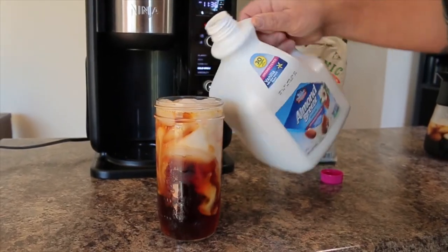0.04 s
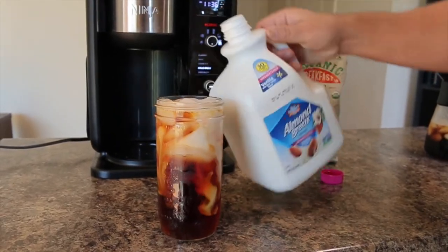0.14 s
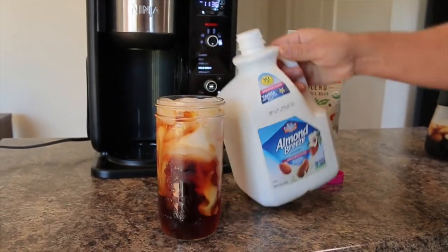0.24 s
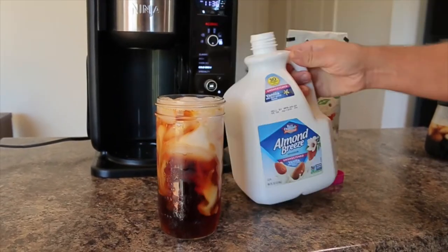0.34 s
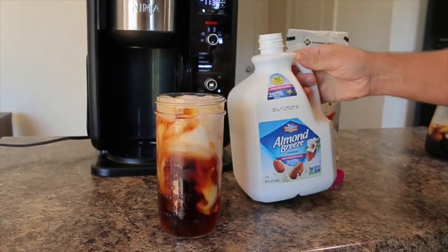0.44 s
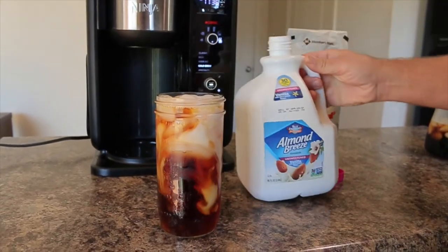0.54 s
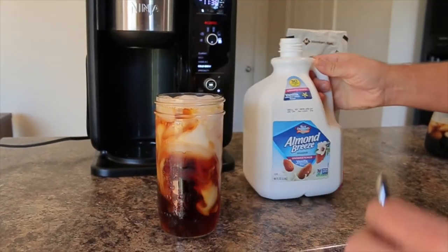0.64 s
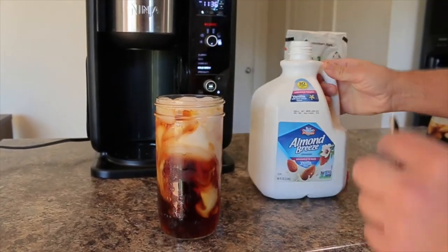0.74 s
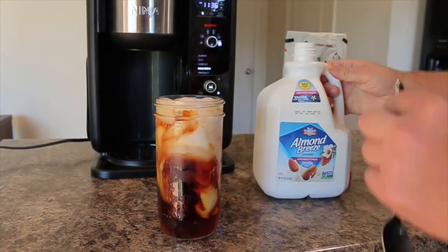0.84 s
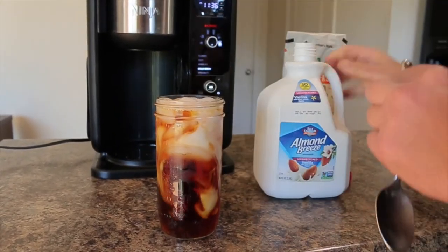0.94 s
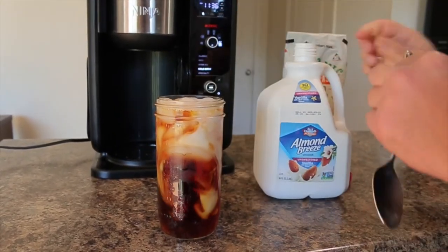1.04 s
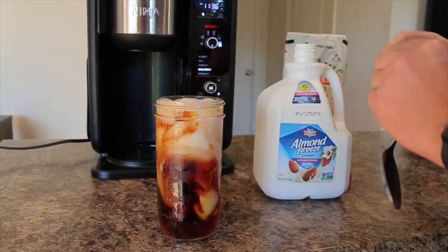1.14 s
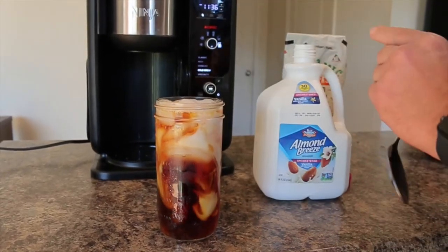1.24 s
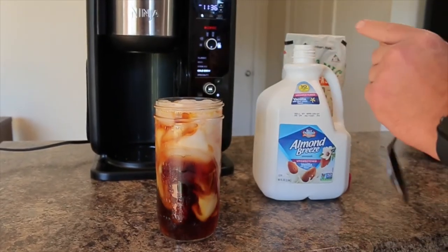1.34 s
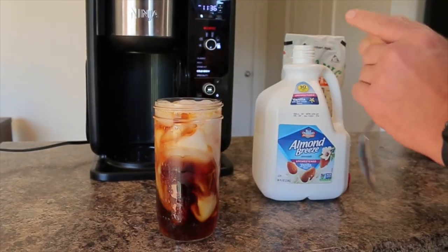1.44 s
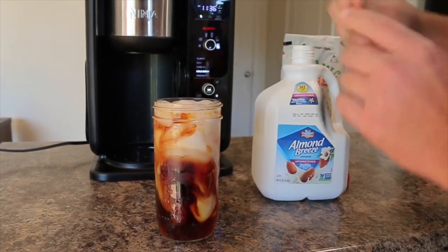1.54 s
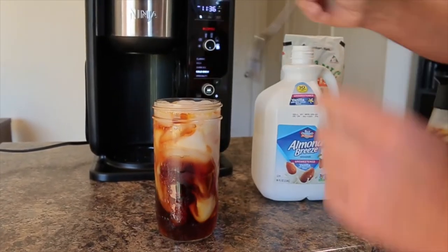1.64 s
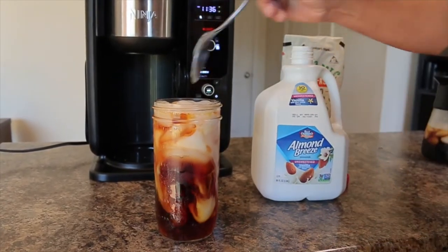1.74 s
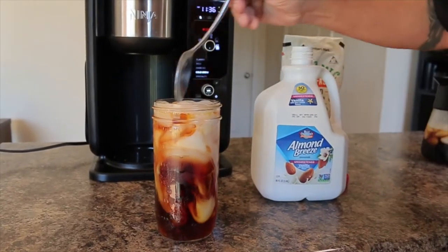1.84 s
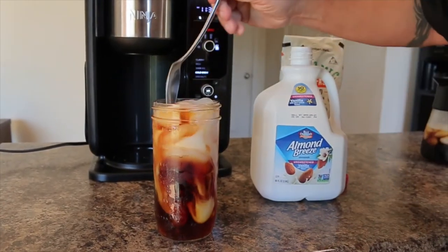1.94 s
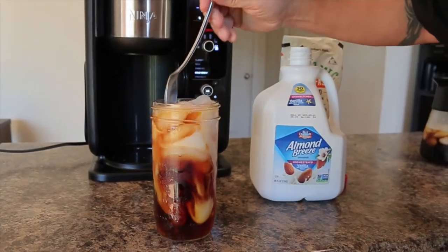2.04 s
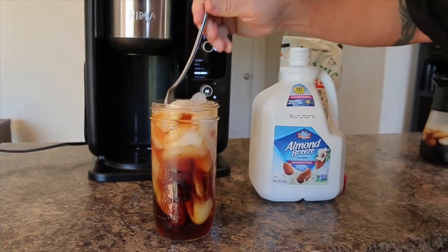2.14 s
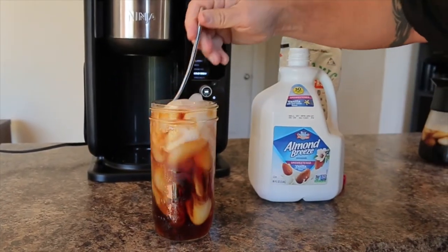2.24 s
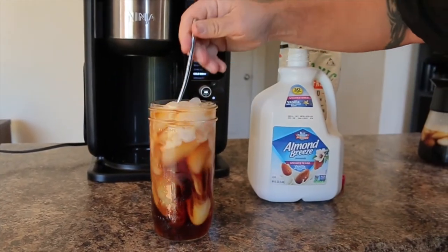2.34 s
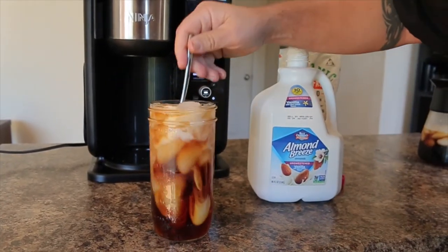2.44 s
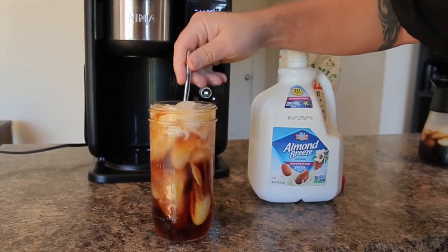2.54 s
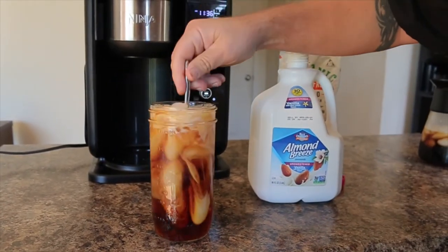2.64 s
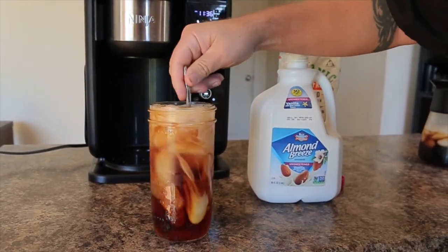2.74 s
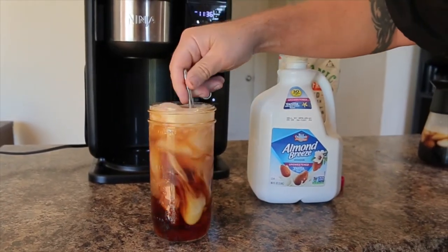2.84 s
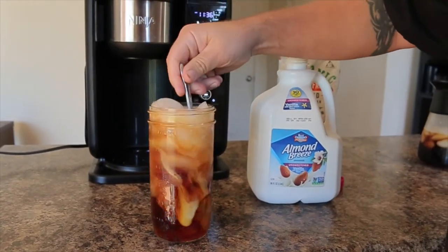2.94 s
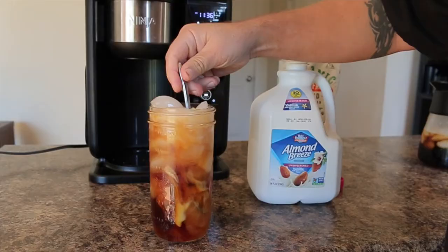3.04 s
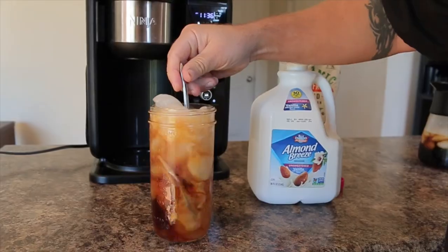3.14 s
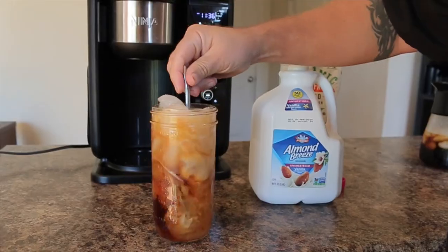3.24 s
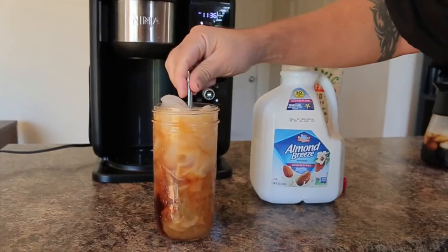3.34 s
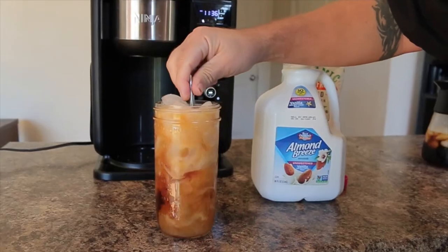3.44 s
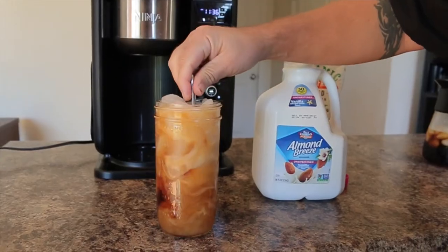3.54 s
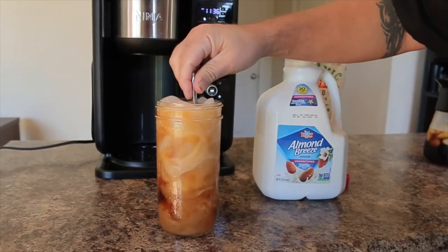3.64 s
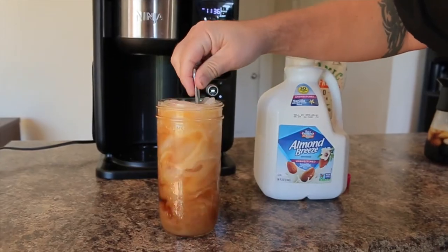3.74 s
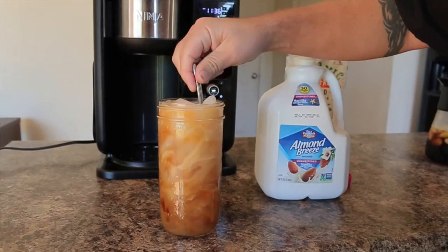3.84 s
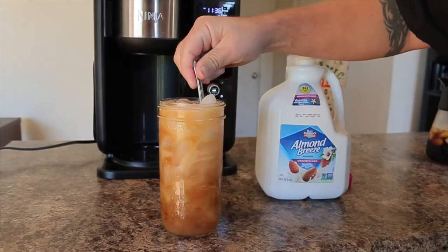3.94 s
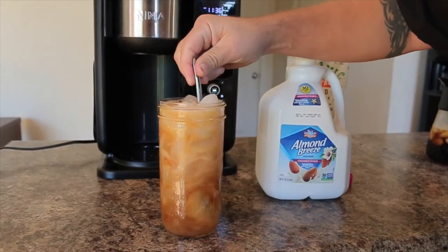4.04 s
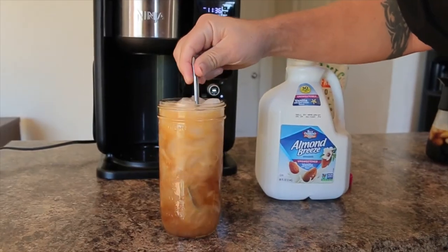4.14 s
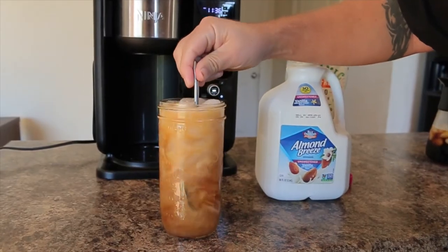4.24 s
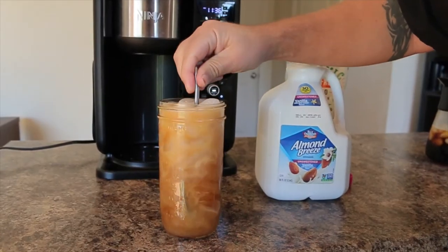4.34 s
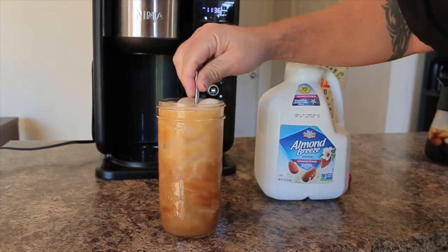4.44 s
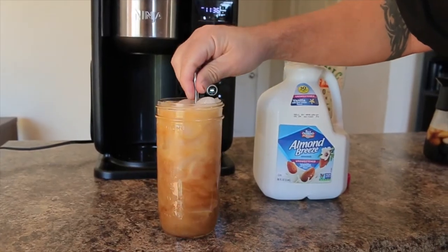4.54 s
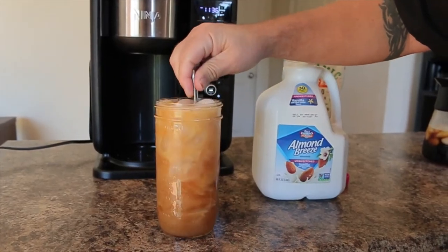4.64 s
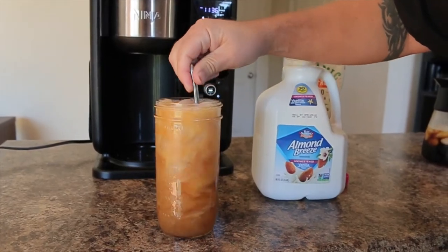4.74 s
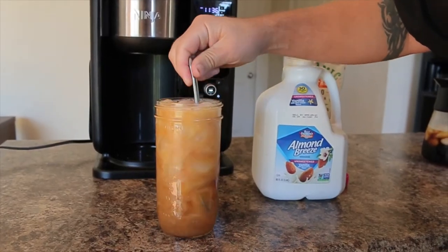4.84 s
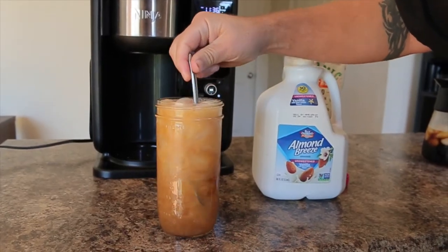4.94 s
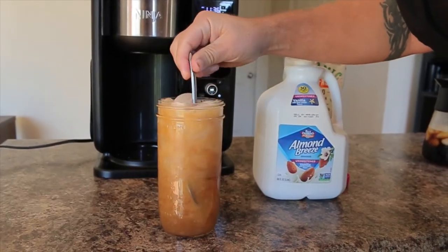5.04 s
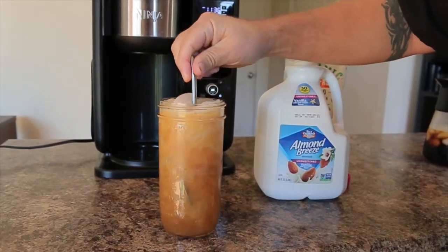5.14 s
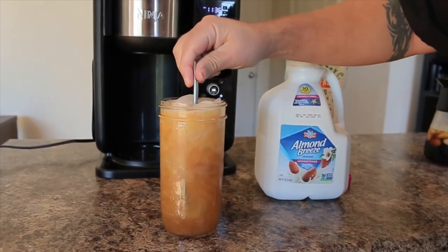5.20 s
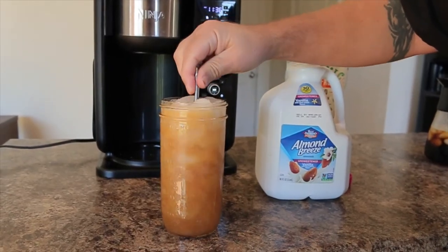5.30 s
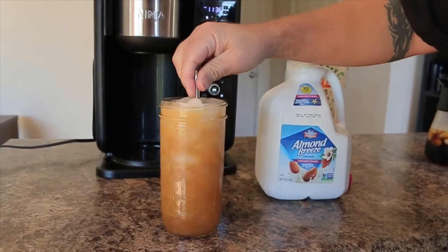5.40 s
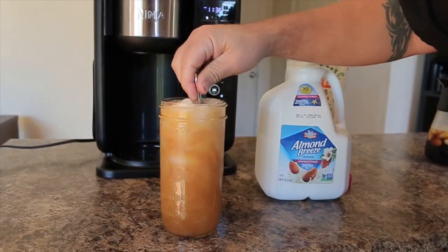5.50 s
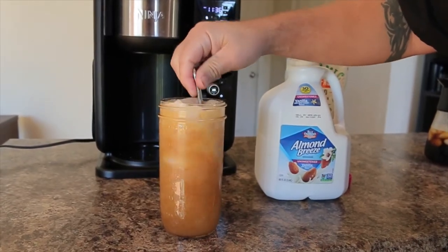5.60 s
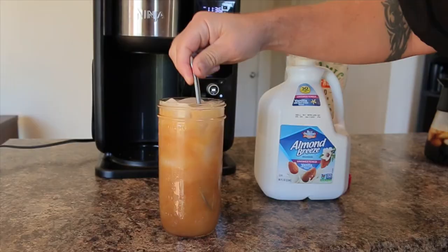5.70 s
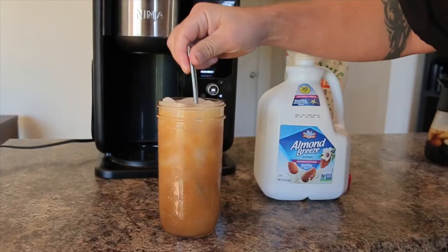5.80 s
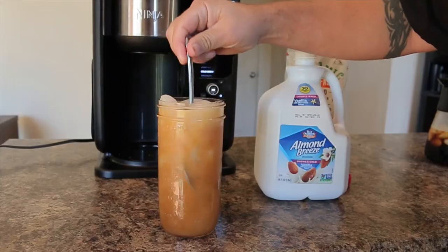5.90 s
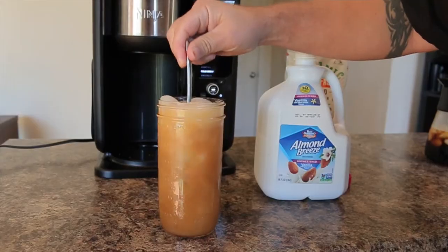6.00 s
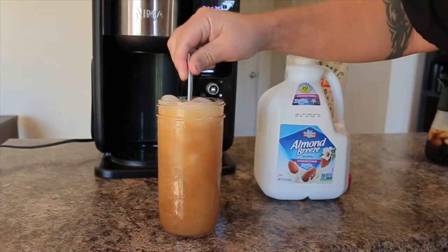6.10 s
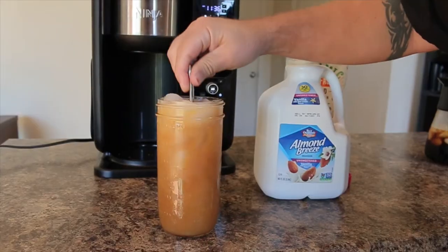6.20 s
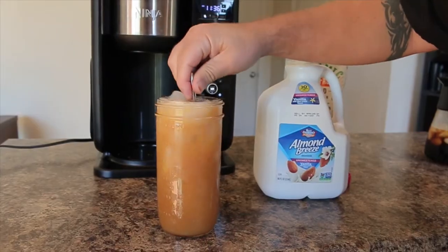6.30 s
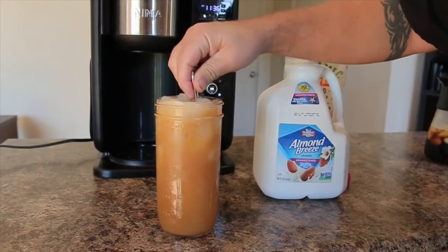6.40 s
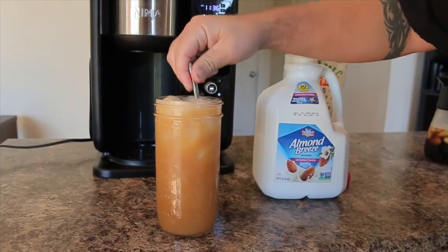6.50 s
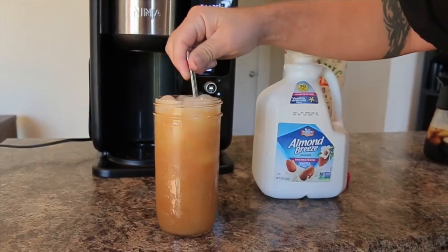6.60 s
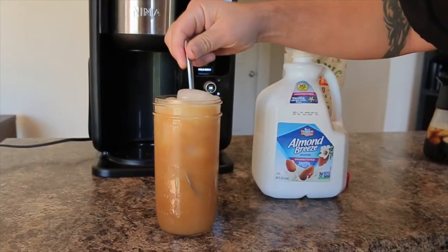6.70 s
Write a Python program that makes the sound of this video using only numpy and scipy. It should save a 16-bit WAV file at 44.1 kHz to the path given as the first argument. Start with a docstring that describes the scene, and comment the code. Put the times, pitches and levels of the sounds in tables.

```python
"""In a small, live kitchen a plastic milk jug is set down on the counter and nudged into place.
Then a long steel spoon stirs a glass jar of iced coffee: clinks and thuds are damped modes and filtered bursts,
rubbing, rolling, swish and jostling ice are coloured trains of tiny impacts, and bubbles are rising blips.
The room answers with decaying noise, over air noise and the wavering tones of an appliance motor."""
import sys
import numpy as np
from scipy import signal
from scipy.fft import rfft, irfft, next_fast_len
from scipy.io import wavfile
from scipy.ndimage import map_coordinates

SR = 44100
rng = np.random.default_rng(int(sys.argv[2]) if len(sys.argv) > 2 else 0)


def put_to_file(sound):
    """Save the sound as 16-bit audio at rate SR, in the file named by the first command-line argument."""
    columns = np.atleast_2d(sound).T  # one column per channel
    safe = np.clip(columns, -1, 1)
    whole_steps = np.round(safe * 32767)
    wavfile.write(sys.argv[1], SR, whole_steps.astype(np.int16))


N = 298116  # length [samples]

# Event and envelope levels are relative: each source may trim them.
# Spoon and ice on the glass: (time [s], ring [dB], clack [dB], hardness [0-1],
# twin-mode balance [about -1 to 1], ping [Hz])
CONTACTS = [(1.8926, -44, -42.5, 0.47, 0.74, 3296), (1.954, -48.5, -52.5, 0.65, .2, 4130),
            (2.138, -48, -44, 0.4, -0.19, 3760), (2.173, -56, -57, 0.83, -0.26, 3730),
            (2.211, -62, -57, .2, 0.4, 3580), (2.304, -48, -52, 0.43, 0.58, 3390),
            (2.386, -57.5, -56.5, .8, -0.12, 3700), (2.417, -57, -49, 0.1, 0.1, 3460),
            (2.549, -60, -57.5, 0, 0, 3780), (2.72, -53, -58, .2, 0.32, 3800),
            (2.7865, -33, -40, 0.48, 1, 3800), (2.8334, -38, -62, 0, .8, 5120),
            (2.8636, -44.5, -50, 0, .2, 5100), (2.936, -51.5, -58, 0.55, -0.22, 3260),
            (3.043, -57, -59, 0.91, .3, 5500), (3.059, -51, -55, 0, -0.023, 5600),
            (3.2167, -42, -53.5, 0.43, -0.73, 3940), (3.264, -55.5, -56, 0, -.1, 4370),
            (3.415, -59, -78, 0, 0.097, 3810), (3.733, -56.5, -62, .1, -0.11, 3910),
            (3.6, -65, -56.5, 0.3, -.1, 5520), (3.645, -44, -55, 0.26, -0.4, 3340),
            (4.083, -54.5, -71, 0, -.2, 3690), (4.1451, -36.5, -47.5, 0.43, -0.94, 5070),
            (4.242, -60, -54.5, .1, 0, 3800), (4.552, -60, -59, 0.5, -0.12, 3230),
            (4.8727, -41, -42.5, 1, 0.24, 3150), (4.995, -58, -61, 0.4, -0.35, 5500),
            (5.5496, -55.5, -53, 0.48, 0.16, 3890), (5.138, -55, -60, 0.1, 0.071, 3930),
            (5.763, -52, -57, 0, -0.31, 4290), (5.8978, -32, -46, 0.46, -.8, 5000),
            (6.169, -50, -54, 0.4, 0, 3300), (6.1758, -43.5, -52.5, 0.24, 0.41, 3340),
            (6.322, -55, -58, .3, -0.29, 3860), (6.3614, -32, -44, 0.62, 1, 3290),
            (6.431, -50, -55, 0, 0.45, 3240), (6.7093, -47, -51, 0, -0.43, 5660),
            (6.7404, -43, -51.5, 0.67, 0.41, 5380)]
# The jar's lingering modes: (frequency [Hz], level [dB], t60 [s])
GLASS_MODES = [(1021, -11.5, 0.26), (1222, -11.5, 0.23), (1650, -23.5, 0.31), (2130, -29, 0.081),
               (2270, -18, 0.036), (2554, -17.5, 0.14), (2860, -36, 0.45), (3240, -15, 0.094),
               (3976, -19, 0.11), (5120, -17, 0.19), (5500, -15, 0.15), (6300, -22, 0.076),
               (7080, -23, 0.15), (7900, -15, 0.2)]
# The wall's main mode, split in two and damped by the drink: (lower [Hz], upper [Hz])
TWIN_HZ = (2674, 2810)
# Where clack, ring, crack and sparkle are strongest: (clack [Hz], ring [Hz], crack [Hz], sparkle [Hz])
ZONES_HZ = (1170, 2560, 3930, 6940)
# Spectra of a contact's noisy parts, low to high: (frequency [Hz], level [dB])
CLACK_SPECTRUM = [(350, -36.5), (720, 1), (950, -7), (1190, 6), (1500, -2), (2200, -5), (2700, 3),
                  (4000, -41.5), (9000, -47)]
CRACK_SPECTRUM = [(2200, -32), (3200, -8), (3850, -3.5), (4500, -8.5), (5250, -13), (6000, -22),
                  (9000, -26.5), (14000, -41)]
SPARKLE_SPECTRUM = [(4000, -40), (6400, 5), (7200, -1), (8500, -10), (10000, -10.5), (12500, -21),
                    (16000, -25)]
# Levels at the softest and the hardest contact [dB]: crack and sparkle over ring, ping over clack
CRACK_OVER_RING_DB, SPARKLE_OVER_RING_DB, PING_OVER_CLACK_DB = [-14, -1], [-36.5, -3.5], [-11, -0.5]

# Envelopes of the stirring: (time [s], swish [dB], jostling ice [dB])
STIR = [(1.92, -73, -69), (2.09, -60, -65.5), (2.26, -57, -60), (2.73, -68.5, -74), (2.94, -57.5, -59),
        (3.39, -67, -66.5), (4.21, -61.5, -67), (4.48, -68.5, -71), (5.02, -61, -61), (5.36, -67, -71.5),
        (5.8, -58, -62), (5.95, -69, -58.5), (6.25, -64, -69), (6.62, -55, -62), (6.76, -48, -68)]
# Spectra of the swishing drink and of cubes on the wall: (frequency [Hz], level [dB])
SWISH_SPECTRUM = [(250, -10), (400, -5.5), (700, -2.5), (950, -9.5), (1200, 4.5), (1450, -3.5), (2000, -15),
                  (3500, -19.5), (7000, -28), (15000, -46)]
ICE_SPECTRUM = [(1200, -22), (2300, -27), (2680, 8), (2850, 7.5), (3100, -25), (3900, -9), (5200, -18),
                (8000, -33), (15000, -45)]
# The drink closes behind a deep stroke: (time [s], level [dB])
GULPS = [(6.53, -34.5), (6.588, -46)]
GULP_ATTACK_S, GULP_T60_S = 0.0051, 0.16
# Spectra of the closing drink and of the foam: (frequency [Hz], level [dB])
GULP_SPECTRUM = [(150, -33), (280, -12), (370, -3.5), (450, 9), (560, -15), (720, 8.5), (880, 4), (1020, 1),
                 (1250, -9), (1500, -8), (2100, -13.5), (3200, -22), (6000, -46)]
FIZZ_SPECTRUM = [(1000, -4), (2500, 3), (5000, -3), (8000, -6.5), (15000, -21)]
# The churning, fizzing wake of that stroke
WAKE_START_S, WAKE_LENGTH_S, WAKE_DB, FIZZ_DB = 6.56, 0.31, -53, -56.5

# The spoon pushes through the cubes: (start [s], length [s], rubbing [dB], rolling [dB])
STROKES = [(1.883, 0.18, -52.5, -53), (2.127, .05, -50, -56), (2.275, 0.081, -52.5, -48.5),
           (2.364, 0.23, -60.5, -50.5), (2.817, 0.26, -59, -72), (3.02, 0.13, -62, -52),
           (3.11, 0.25, -80, -56), (3.565, 0.14, -62, -63), (3.928, 0.078, -54.5, -61),
           (4.54, 0.1, -57.5, -60), (4.877, 0.4, -64, -64), (5.53, .13, -62, -61), (5.734, 0.12, -56, -57),
           (6.308, 0.1, -56, -49)]
STROKE_RISE = 0.28  # share of a stroke spent building up
# Spectra of steel on ice and of rolling cubes: (frequency [Hz], level [dB])
RASP_SPECTRUM = [(500, -1), (1180, 12.5), (1600, 0), (2200, 5), (2800, 3.5), (3300, 3.5), (3900, 0),
                 (5200, -19), (8000, -14), (14000, -35)]
RUMBLE_SPECTRUM = [(45, -44.5), (80, -5), (100, -0.5), (125, -8.5), (165, -2.5), (210, -6.5), (280, -13.5),
                   (450, -15), (900, -48.5)]
ROLL_DB = -69.5  # cubes trundling between strokes

# The spoon shoves cubes against the jar's base: (time [s], boom [dB], knock [dB])
THUDS = [(1.892, -49, -43.5), (1.953, -52.5, -48), (1.984, -46, -48.5), (2.139, -49.5, -44.5),
         (2.788, -56, -49.5), (3.6, -51, -48), (3.644, -46.5, -44.5), (3.658, -51.5, -50.5),
         (4.59, -54, -53), (4.874, -58, -49), (5.553, -42.5, -54), (5.568, -46.5, -49.5), (5.779, -54, -49),
         (6.385, -49.5, -48), (6.599, -53, -51)]
# Modes of the counter and what stands on it: (frequency [Hz], width [Hz], level [dB])
BOOM_MODES = [(80.6, 13, -5.5), (103, 25, -1.5), (176, 26, -2), (208, 24, 0.5)]
# Higher modes of the same blows: (frequency [Hz], width [Hz], level [dB])
KNOCK_MODES = [(308, 21, -2), (378, 49, 0.5), (710, 71, -9.5), (910, 67, -17)]
# The jug lands and rocks: (time [s], level [dB])
LANDINGS = [(0.3349, -29.5), (0.362, -47), (.374, -46), (.535, -39.5), (.561, -48.5), (0.782, -49)]
# Modes of the jug on the counter: (frequency [Hz], width [Hz], level [dB])
PLASTIC_MODES = [(84.6, 25, -2), (97, 35, -0.5), (172, 35, 4), (215, 44, -2.5), (291.6, 19, -2.5),
                 (435, 85, -11), (521, 43, -9), (705, 68, -11.5), (840, 150, -14), (1420, 310, -21.5),
                 (1760, 110, -24.5)]
# The jug's base catches, then slides: (time [s], catch [dB], slide length [s], drag [dB])
SCUFFS = [(0.334, -44.5, 0.069, -47), (0.533, -40.5, .12, -49.5), (0.735, -39.5, 0.17, -51),
          (0.83, -41, 0.1, -54), (0.896, -47, 0.098, -47)]
SLIDE_RISE = 0.13  # share of a slide spent gaining speed
# Spectrum of the scraping base: (frequency [Hz], level [dB])
SCRAPE_SPECTRUM = [(150, -45), (250, 1), (332, -4.5), (404, 0.5), (462, -8.5), (562, -2.5), (1360, -14),
                   (2670, -15.5), (9000, -40), (11700, -71), (19800, -120)]
# The jug's wall shudders while pushed: limits, first level, fade, time to start and stop
JUDDER_START_S, JUDDER_STOP_S = 0.554, 1.05
JUDDER_DB, JUDDER_FADE_DB_PER_S, JUDDER_EDGE_S = -44.5, 31, 0.024

# Decay of the room: (frequency [Hz], t60 [s])
ROOM_T60 = [(100, 0.38), (400, 0.35), (1200, 0.49), (3000, 0.33), (6000, 0.52), (14000, 0.39)]
# Correlation of the room's tail: (frequency [Hz], left-right likeness [-1 to 1])
ROOM_ALIKE = [(200, .99), (1000, 0.9), (2800, 0.43), (5000, 0.064), (10000, .05)]
# The kitchen's steady noise: (frequency [Hz], level [dB])
AIR_SPECTRUM = [(15, -48), (25, -31), (64, -9.5), (91, -32), (107, -14), (221, -6.5), (260, -11.5),
                (359, -7), (703, -16.5), (762, -16), (919, -17.5), (1110, -18.5), (2300, -26), (2630, -27),
                (15500, -35)]
AIR_DB = -57.5
# Correlation of that noise: (frequency [Hz], left-right likeness [-1 to 1])
AIR_ALIKE = [(60, 0.63), (150, 0.95), (380, 0.89), (950, 0.81), (2380, 0.19), (5980, -0.015),
             (15000, -0.079)]
# Lines of an appliance motor: (frequency [Hz], level [dB])
HUM = [(226.1, -70.5), (301.5, -67.5), (355.3, -65), (516.8, -95), (710.6, -72.5)]
TOP_HZ = 15800  # upper band limit


def clinks(twin_t60=0.032, ping_t60=0.049, clack_db=-1, lean_db=1.6):
    """Impact excitation: harder contacts are brighter; beating twin modes start the ring hard or let it swell."""
    out = np.zeros((2, N))
    t = np.arange(SR // 3) / SR
    brief = t[:SR // 16]

    def tone(hz, t60):
        """Free decay of one mode."""
        return blow(np.sin(2 * np.pi * hz * t) * np.exp(-np.log(1000) * t / t60))

    for s, ring, clack, hardness, balance, ping_hz in CONTACTS:
        crack = ring + np.interp(hardness, [0, 1], CRACK_OVER_RING_DB)
        sparkle = ring + np.interp(hardness, [0, 1], SPARKLE_OVER_RING_DB)
        ping = clack + np.interp(hardness, [0, 1], PING_OVER_CLACK_DB)

        low, high = (np.sin(2 * np.pi * hz * (1 + 0.011 * rng.normal()) * brief) for hz in TWIN_HZ)
        wall = amp(ring) * blow((high + balance * low) * amp(-60 * brief / twin_t60))
        sound = wall * amp([[-lean_db], [lean_db]])  # the wall radiates more to the right
        clack_burst = burst(brief, t60=0.056, scatter=3.0)
        crack_burst = burst(brief, t60=0.026, scatter=0.83)
        sparkle_burst = burst(brief, t60=0.036, scatter=2.5)
        sound += amp(clack + clack_db) * blow(coloured(clack_burst, CLACK_SPECTRUM))
        sound += amp(crack) * blow(coloured(crack_burst, CRACK_SPECTRUM))
        sound += amp(sparkle) * blow(coloured(sparkle_burst, SPARKLE_SPECTRUM))
        add(out, s, sound)
        add(out, s, amp(ping) * tone(ping_hz, ping_t60))  # the upper mode that this spot favours

        # Each lingering mode is driven by the blow's strength at its own frequency.
        drive = list(zip(ZONES_HZ, (clack, ring, crack, sparkle)))
        for hz, db, t60 in GLASS_MODES:
            level = along(drive, hz) + db + 2 * rng.normal()
            add(out, s, amp(level) * tone(hz, t60))
    return out


def stirring(swish_db=-6, gurgle_db=-9, ice_db=-2.0, surge_db=4.5, count=5, scatter=0.029):
    """Agitated flow and mass loading: the drink surges; the liquid behind the wall shifts the pitch of ice ticks."""
    swish, jostle = gains(STIR)
    wash = amp(swish_db) * unit(coloured(grains(rate=650, spread_db=12.0), SWISH_SPECTRUM))
    gurgle = amp(gurgle_db) * bubbles(count=450, centre_hz=1090, spread=0.296, cycles=3.8)
    surge = amp(surge_db * wobble(16))
    cubes = 0
    for shift in 1 + scatter * np.linspace(-1, 1, count):
        shifted = np.multiply(ICE_SPECTRUM, [shift, 1])  # moves frequencies, keeps levels
        cubes = cubes + coloured(grains(rate=28, spread_db=8), shifted)
    return swish * surge * (wash + gurgle) + amp(ice_db) * jostle * unit(cubes)


def slosh(gulp_db=-4, bubble_db=-6, wake_rise=0.44):
    """Cavity closure: liquid fills the hollow behind the spoon and traps bubbles; its foam fizzes."""
    t = np.arange(SR // 3) / SR
    wake = swell(WAKE_START_S, WAKE_LENGTH_S, wake_rise)
    churn = amp(WAKE_DB) * wake
    for s, db in GULPS:
        add(churn, s, np.minimum(t / GULP_ATTACK_S, 1) * amp(db - 60 * t / GULP_T60_S))
    hollow = amp(gulp_db) * unit(coloured(grains(rate=1500, spread_db=2), GULP_SPECTRUM))
    trapped = amp(bubble_db) * bubbles(count=3000, centre_hz=725, spread=0.292, cycles=3.7)
    foam = amp(FIZZ_DB) * wake * unit(coloured(grains(rate=2100, spread_db=-2.5), FIZZ_SPECTRUM))
    return churn * (hollow + trapped) + foam


def bubbles(count, centre_hz, spread, cycles, rise=0.26):
    """Bubble resonance: a froth of short rising blips; bubbles of unusual size are weaker."""
    out = np.zeros(N)
    t = np.arange(SR // 32) / SR
    for when, size in zip(rng.random(count) * N / SR, rng.standard_normal(count)):
        hz = centre_hz * np.exp(spread * size)
        age = t * hz / cycles
        decay = np.exp(-age - 0.12 * abs(size))
        add(out, when, decay * np.sin(2 * np.pi * hz * t * (1 + rise * age / 4)))
    return unit(out)


def rubbing(rub_db=-1):
    """Stick-slip friction: steel catches on ice in dense little impacts."""
    pressure = sum(amp(rub) * swell(s, length, STROKE_RISE) for s, length, rub, _ in STROKES)
    return amp(rub_db) * pressure * unit(coloured(grains(rate=450, spread_db=9), RASP_SPECTRUM))


def rolling(roll_db=-6):
    """Rolling excitation: cubes trundle faster at each stroke, and the counter drones with them."""
    speed = amp(ROLL_DB) * (np.arange(N) / SR > STROKES[0][0])
    for s, length, _, roll in STROKES:
        speed = speed + amp(roll + roll_db) * swell(s, length, STROKE_RISE)
    return speed * unit(coloured(grains(rate=400, spread_db=1.0), RUMBLE_SPECTRUM))


def thuds(boom_db=2, knock_db=1, landing_db=3):
    """Structure-borne sound: blunt blows of jar and jug excite the counter's modes."""
    out = np.zeros(N)
    t = np.arange(SR // 3) / SR
    for s, boom, knock in THUDS:
        add(out, s, amp(boom + boom_db) * body(t, BOOM_MODES, detune=0.056, vary_db=2.5))
        add(out, s, amp(knock + knock_db) * body(t, KNOCK_MODES, detune=0.049, vary_db=-1.0))
    for s, db in LANDINGS:
        add(out, s, amp(db + landing_db) * body(t, PLASTIC_MODES, detune=0.008, vary_db=1.5))
    return out


def body(t, modes, detune, vary_db):
    """Modal superposition: damped resonances, struck at new strengths and slightly new pitches."""
    out = np.zeros(len(t))
    for k, (hz, width, db) in enumerate(modes):
        strength = (-1) ** k * amp(db + vary_db * rng.normal()) * np.sqrt(width)
        pitch = hz * (1 + detune * rng.normal())
        out += strength * np.exp(-np.pi * width * t) * np.sin(2 * np.pi * pitch * t)
    return blow(out)


def jug(wall_hz=173, slide_db=-6, scuff_db=-6):
    """Friction-driven vibration: the base catches and slides a little, and the thin wall shudders."""
    t = np.arange(N) / SR
    pushed = np.clip(np.minimum(t - JUDDER_START_S, JUDDER_STOP_S - t) / JUDDER_EDGE_S, 0, 1)
    shudder = pushed * amp(JUDDER_DB - JUDDER_FADE_DB_PER_S * (t - JUDDER_START_S))
    judder = shudder * np.sqrt(2) * np.sin(2 * np.pi * wall_hz * t + 1.14 * wobble(14.2))

    scuffs, speed = np.zeros((2, N)), np.zeros(N)
    for s, catch, length, drag in SCUFFS:
        push = burst(t[:SR // 4], t60=0.087, scatter=2.9)
        add(scuffs, s, amp(catch + scuff_db) * blow(coloured(push, SCRAPE_SPECTRUM)))
        speed += amp(drag) * swell(s, length, SLIDE_RISE)
    slide = speed * amp(slide_db) * unit(coloured(grains(rate=1100, spread_db=3.5), SCRAPE_SPECTRUM))
    return judder, slide + scuffs


def kitchen(x, count=12):
    """Reverberation as convolution: the echoes change from stretch to stretch as the arm moves about."""
    out = np.zeros((2, N))
    mono = x.mean(axis=0)
    step = N // count + 1
    for start in range(0, N, step):
        echoes = signal.fftconvolve(mono[None, start:start + step], room_tail(), axes=1)
        add(out, start / SR, echoes)
    return out


def room_tail(delay=0.0089, build=0.0019, near=1.5, near_life=0.0063):
    """Frequency-dependent absorption: walls and appliances answer, the closest loudest (times in s)."""
    flat = [(100, 0), (10000, 0)]
    hz, t, z = signal.stft(stereo_noise(SR // 2, flat, ROOM_ALIKE), SR, nperseg=256)
    tail = signal.istft(z * amp(-60 * t / along(ROOM_T60, hz)[:, None]), SR, nperseg=256)[1]
    age = np.maximum(np.arange(tail.shape[1]) / SR - delay, 0)
    tail = tail * (1 - np.exp(-age / build)) * (1 + near * np.exp(-age / near_life))
    return tail / np.linalg.norm(tail[0])


def background(hum_db=-1):
    """Stationary noise and line spectrum: air noise and the slightly unsteady tones of a motor."""
    t = np.arange(N) / SR
    hum = np.zeros(N)
    for hz, db in HUM:
        level = amp(db + 2.7 * wobble(3.05))
        hum += level * np.sqrt(2) * np.sin(2 * np.pi * hz * t + 0.76 * wobble(7))
    air = amp(AIR_DB) * unit(stereo_noise(N, AIR_SPECTRUM, AIR_ALIKE))
    return air + amp(hum_db) * hum


def stereo_noise(n, spectrum, alike):
    """Interchannel correlation: mid and side noise mixed to a given colour and left-right likeness."""
    size = next_fast_len(n)
    hz = np.fft.rfftfreq(size, 1 / SR)
    turn = np.arccos(np.clip(along(alike, hz), -1, 1)) / 2
    z = rfft(rng.standard_normal((2, size))) * amp(along(spectrum, hz))
    mid, side = irfft(z * [np.cos(turn), np.sin(turn)])[:, :n]
    return np.array([mid + side, mid - side])


def burst(t, t60, scatter):
    """Impulse excitation: a sharp push, then brief random chatter that differs between the channels."""
    chatter = rng.standard_normal(len(t)) + [[.5], [-.5]] * rng.standard_normal(len(t))
    return (t == 0) + scatter * unit(chatter * amp(-60 * t / t60)) / np.sqrt(len(t))


def grains(rate, spread_db):
    """Random point process: tiny impacts, rate a second on average, of scattered size and sign."""
    sizes = amp(spread_db * np.clip(rng.standard_normal(N), -2, 2)) * rng.choice([-1, 1], N)
    return sizes * (rng.random(N) < rate / SR)


def coloured(x, points):
    """Minimum-phase filtering: x through a causal filter with the (frequency [Hz], level [dB]) shape."""
    size = 2048
    cepstrum = irfft(np.log(amp(along(points, np.fft.rfftfreq(size, 1 / SR)))))
    cepstrum[1:size // 2] *= 2  # fold the cepstrum onto positive time
    cepstrum[size // 2 + 1:] = 0
    response = irfft(np.exp(rfft(cepstrum)))
    x = np.atleast_2d(x)
    return signal.oaconvolve(x, response[None], axes=1)[:, :x.shape[-1]]


def swell(s, length, rise):
    """Triangular envelope: grows from time s for the share rise of its length, then falls to nothing."""
    peak = np.clip(rise, .01, .99)
    return np.interp((np.arange(N) / SR - s) / length, [0, peak, 1], [0, 1, 0])


def gains(rows):
    """Envelope interpolation in decibels: one gain per sample for each column, -120 dB outside the rows."""
    s, *cols = np.transpose(rows)
    return [amp(np.interp(np.arange(N) / SR, s, c, left=-120, right=-120)) for c in cols]


def wobble(rate):
    """Slow random modulation: a smooth curve with rate knots a second."""
    return map_coordinates(rng.standard_normal(int(N * rate / SR) + 4), [np.arange(N) * rate / SR])


def along(points, hz):
    """Interpolation of (frequency [Hz], value) points on a logarithmic frequency axis."""
    f, v = np.transpose(points)
    return np.interp(np.log(hz + 1), np.log(f + 1), v)


def amp(db):
    """Logarithmic level: decibels to amplitude gain."""
    return 10 ** (np.asarray(db) / 20)


def unit(x):
    """Power normalization: x scaled to rms 1."""
    return x / np.sqrt(np.mean(x ** 2) + 1e-20)


def blow(x):
    """Energy normalization: x scaled to the energy of 10 ms at rms 1."""
    return unit(x) * np.sqrt(.01 * SR / x.shape[-1])


def add(track, s, x):
    """Linear superposition: mixes x into track from time s on."""
    part = track[..., round(s * SR):][..., :x.shape[-1]]
    part += x[..., :part.shape[-1]]


def scene():
    """Direct and reverberant field: close sources, with the counter's boom a little to the left."""
    glass, knocks = clinks(), thuds()
    drink = stirring() + slosh() + rubbing()
    judder, slide = jug()
    counter = (knocks + judder + rolling()) * amp([[.7], [-.7]])
    direct = glass + counter + drink + slide
    sent = amp(-5.0) * glass + amp(-0.5) * knocks + amp(-1) * (drink + slide)
    return direct + kitchen(sent) + background()


def record(dry, low_hz=52):
    """Band limitation: the deep bass rolls off, and nothing passes above the upper limit."""
    m = next_fast_len(N + SR // 2)
    thinned = signal.sosfilt(signal.butter(3, low_hz, "high", fs=SR, output="sos"), dry)
    passband = np.fft.rfftfreq(m, 1 / SR) < TOP_HZ
    return irfft(rfft(thinned, m) * passband, m)[:, :N]


dry = scene()
out = record(dry)
put_to_file(out)
```